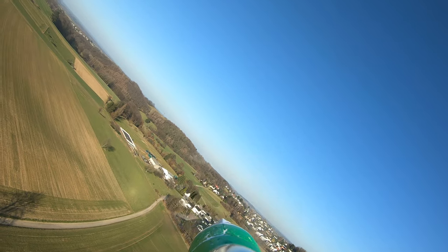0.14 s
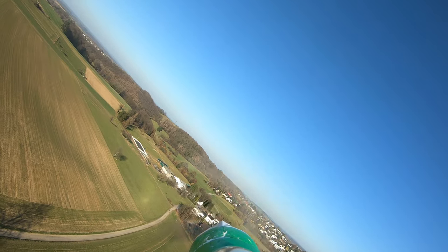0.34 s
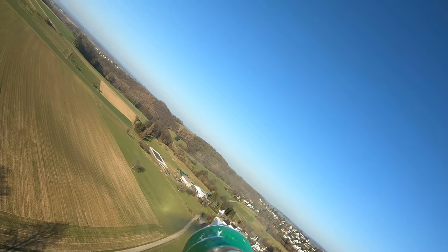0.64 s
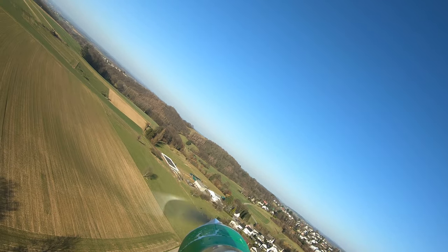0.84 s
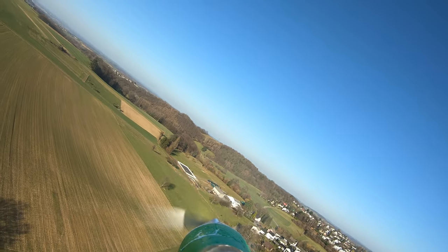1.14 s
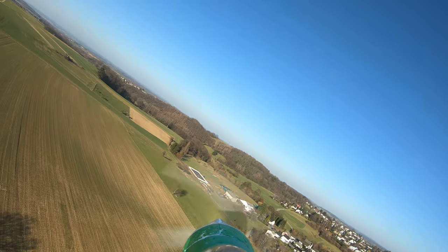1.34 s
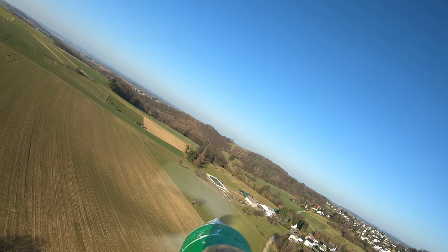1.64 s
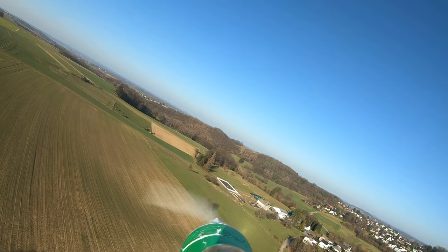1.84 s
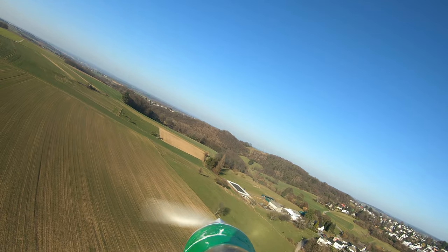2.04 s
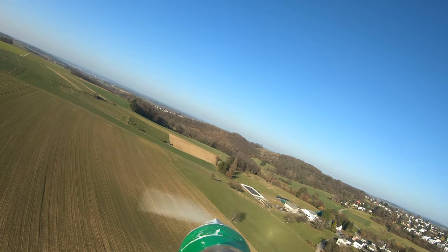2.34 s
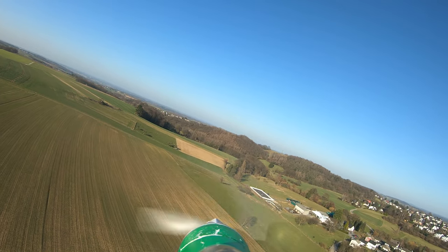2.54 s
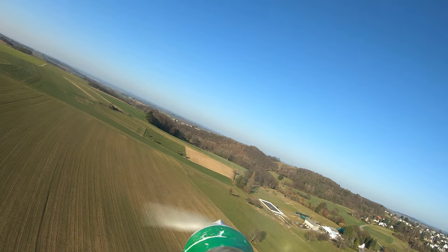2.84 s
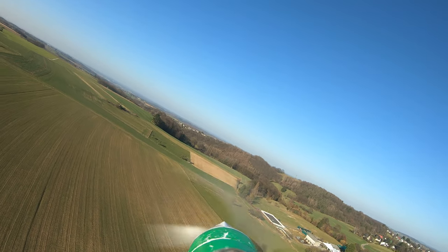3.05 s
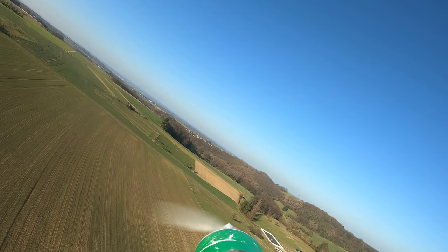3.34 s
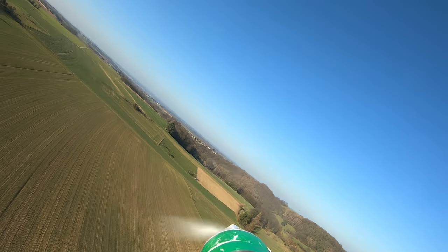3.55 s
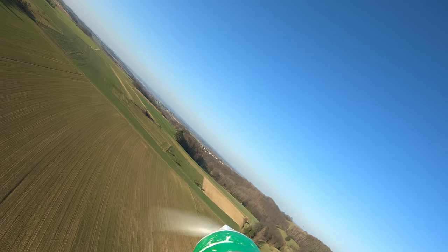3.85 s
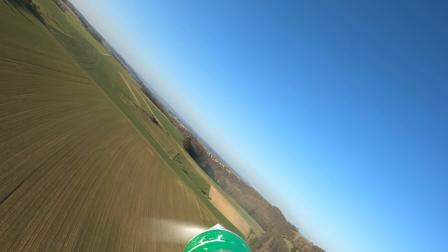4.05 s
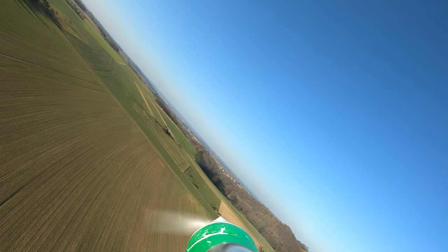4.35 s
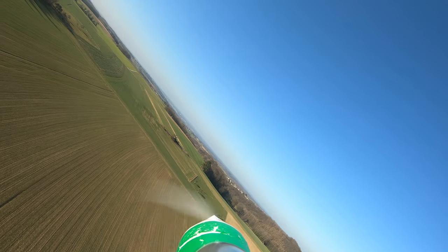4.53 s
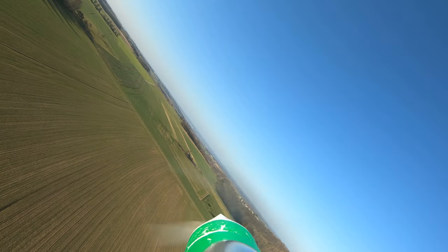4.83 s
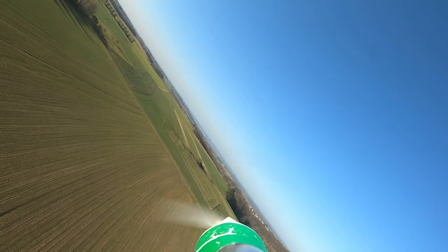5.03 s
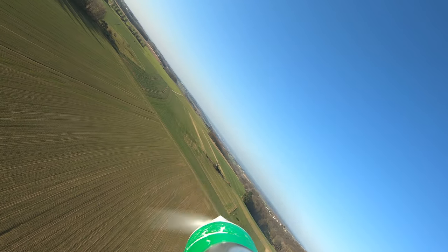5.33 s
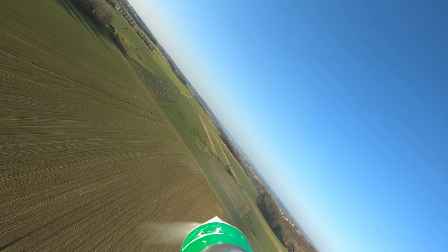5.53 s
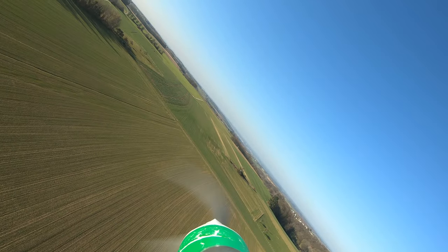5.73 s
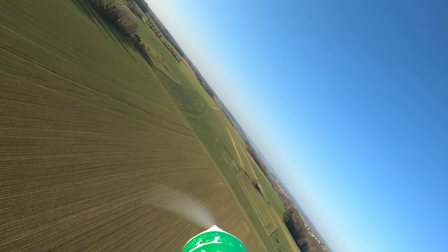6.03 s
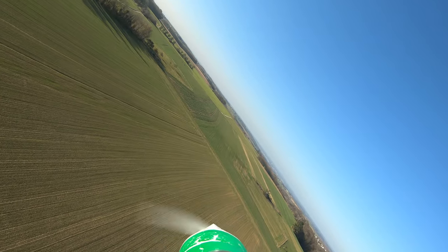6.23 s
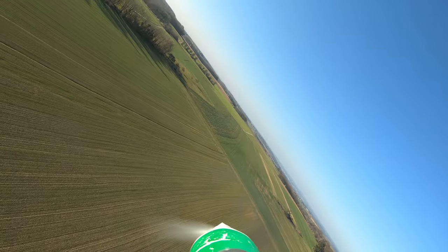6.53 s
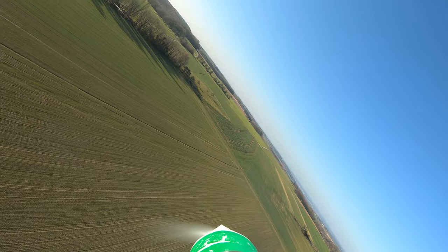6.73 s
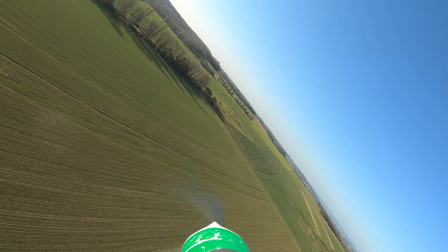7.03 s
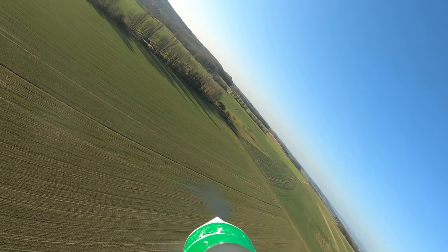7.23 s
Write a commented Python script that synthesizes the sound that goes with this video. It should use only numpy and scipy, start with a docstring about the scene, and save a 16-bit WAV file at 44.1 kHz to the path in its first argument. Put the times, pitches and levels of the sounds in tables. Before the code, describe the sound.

Close behind the propeller of a small electric model plane in flight, a low, buzzing drone holds almost steady while wind thumps and hisses over the microphone. Eddies briefly make the hum falter. Around five seconds the throttle eases, the pitch sags and the tone thins into rough wind and a high motor whine, before the hum firms up at a lower speed.

```python
"""On the fuselage of a small electric model airplane, a camera rides just behind the two-blade propeller.
The blades hum and swish, the slipstream buffets both microphone ports and hisses over the fuselage.
Now and then an eddy makes the drone stumble. After five seconds the throttle comes back: the pitch sags,
the blades freewheel in rough air and the motor and its controller whine, until the blades bite again
at the lower speed. Tones follow the blade phase; the air is coloured noise steered by turbulence and gusts."""
import sys
import numpy as np
from scipy import signal
from scipy.fft import rfft
from scipy.io import wavfile
from scipy.ndimage import uniform_filter1d

SR = 44100
rng = np.random.default_rng(int(sys.argv[2]) if len(sys.argv) > 2 else 0)


def master(y):
    """Save y as 16-bit WAV."""
    cut = np.clip(np.atleast_2d(y).T, -1, 1)
    pcm = np.round(cut * 32767)  # scale
    wavfile.write(sys.argv[1], SR, pcm.astype(np.int16))


N = 325458
TIME = np.arange(N) / SR


def undb(db):
    """Decibels to gain."""
    return 10 ** (np.asarray(db) / 20)


def curves(table):
    """Each column of a timed table, joined by straight lines."""
    time_s, *columns = np.transpose(table)
    return [np.interp(TIME, time_s, column) for column in columns]


def walk(rate_hz):
    """Random levels held 1 / rate_hz seconds and smoothed twice; spread near 1."""
    hold = max(int(SR / rate_hz), 2)
    held = rng.standard_normal(4096)[(np.arange(N) // hold) % 4096]
    return 1.55 * uniform_filter1d(uniform_filter1d(held, hold), hold)


def white():
    """White noise."""
    return rng.standard_normal(N)


def colour(x, spectrum):
    """Give x a spectrum; the result is analytic and its real part has rms 1."""
    hz, db = np.transpose(spectrum)
    bin_hz = np.maximum(np.arange(N // 2 + 1) * SR / N, 1)
    gain = undb(np.interp(np.log(bin_hz), np.log(hz), db, left=-120, right=-120))
    # leaving the negative frequencies empty makes the signal analytic
    analytic = np.fft.ifft(rfft(x) * gain, N)
    return analytic / analytic.real.std()


def tone(phase, db):
    """Analytic sine whose real part has the given rms level."""
    return np.sqrt(2) * undb(db) * np.exp(1j * phase)


def ports(analytic, pan_db, lead):
    """An analytic sound at both ports: left minus right in dB, left leading by an angle in radians."""
    left = (analytic * np.exp(1j * lead)).real * undb(pan_db / 2)
    right = analytic.real * undb(-pan_db / 2)
    return np.array([left, right])


# propeller speed; columns: time_s, blade_rate_hz
BLADE_RATE = [(0, 145), (.2, 143.6), (.45, 144.5), (.8, 145.2), (1.25, 147.1), (2.1, 146.6), (4.3, 146.8),
              (4.45, 146.3), (4.65, 143.7), (5.08, 143.1), (5.2, 139), (5.3, 134.7), (5.45, 127.2),
              (5.6, 123.2), (5.88, 120.7), (6.35, 121.9), (6.55, 121.2), (6.68, 120), (6.95, 120.1),
              (7.18, 122.3), (7.38, 122.1)]
# roughness of the air that meets the nose; columns: time_s, turbulence_db (above the usual)
TURBULENCE = [(0, 10), (.06, -7.5), (.15, 1.5), (.29, -1), (.43, 2), (.61, -0.5), (.95, -1), (1.1, .5),
              (1.44, 0), (1.58, -2), (1.75, 2), (1.91, -1), (2.18, 2), (2.36, -1.5), (2.47, 3.5),
              (2.58, 0.5), (2.66, -2), (2.8, -4.5), (3.1, -2.5), (3.35, .5), (3.5, -0.5), (3.62, 2),
              (3.76, 5.5), (3.84, 1), (3.98, 4.5), (4.05, 2.5), (4.12, 0), (4.2, 1), (4.325, 5), (4.36, -4),
              (4.6, -2.5), (4.76, 0.5), (4.85, -2), (5.02, 3), (5.5, 1.5), (6.0, 2.5), (6.9, 2), (7.06, 0),
              (7.13, -5)]
CRUISE_HZ, SLOW_HZ = 146, 122  # blade rates
# with the throttle back the blades stop pulling and freewheel for a while
FREEWHEEL_START_S, FREEWHEEL_ATTACK_S, FREEWHEEL_END_S, FREEWHEEL_RELEASE_S = 4.95, 0.19, 7.12, 0.23


def flight():
    """The state of the flight: turbulence in dB, how far the propeller has slowed and how freely it wheels (0-1)."""
    hz, = curves(BLADE_RATE)
    turbulence_db, = curves(TURBULENCE)
    slow = np.clip((CRUISE_HZ - hz) / (CRUISE_HZ - SLOW_HZ), 0, 1)
    onset = (TIME - FREEWHEEL_START_S) / FREEWHEEL_ATTACK_S
    release = (FREEWHEEL_END_S - TIME) / FREEWHEEL_RELEASE_S
    free = np.clip(np.minimum(onset, release), 0, 1)
    return turbulence_db, slow, free


def level(law, state):
    """A sound's base level in dB, following the state of the flight."""
    cruise_db, db_per_turbulence_db, slow_db, freewheel_db = law
    turbulence_db, slow, free = state
    return cruise_db + db_per_turbulence_db * turbulence_db + slow_db * slow + freewheel_db * free


# single eddies that strike the nose; columns: centre_s, length_s (width at 1/e), depth (0-1)
EDDIES = [(0.158, 0.086, 0.95), (0.343, 0.15, 0.34), (0.51, 0.083, 0.24), (1.071, 0.16, 1),
          (1.724, 0.095, 0.85), (1.949, 0.25, 0.2), (2.153, 0.17, 0.32), (2.426, 0.061, 0.98),
          (3.378, 0.13, 0.43), (3.617, 0.083, .9), (3.763, 0.12, 0.95), (3.93, 0.14, 1), (4.09, .06, 0.5),
          (4.278, 0.076, 1), (4.541, 0.046, 0), (4.785, 0.19, .3), (5.021, 0.18, .8), (5.28, 0.1, 0.2),
          (5.627, .08, 0.67), (5.93, 0.19, .9), (6.42, 0.07, .6), (6.73, .07, 0.3)]


def eddies():
    """How far passing eddies tear the flow off the ports (about 0-1): each swells and ebbs like a bell curve."""
    return sum(depth * np.exp(-(2 * (TIME - centre_s) / length_s) ** 2)
               for centre_s, length_s, depth in EDDIES)


# deep gusts around the camera, relative spectrum; columns: pitch_hz, density_db (per Hz)
RUMBLE = [(15, -13), (35, 0), (65, 3), (110, -11.5), (190, -0.5), (300, -22.5)]
# their base level; columns: cruise_db, db_per_turbulence_db, slow_db, freewheel_db (the last two added)
RUMBLE_LEVEL = (-31.7, -0.85, 2.5, 8.5)


def rumble(state, shared=0.26, gust_db=1.8):
    """Large slow eddies wrap the whole camera: low noise, partly common to both ports."""
    common = white()
    sides = []
    for _ in range(2):
        mixed = np.sqrt(shared) * common + np.sqrt(1 - shared) * white()
        sides.append(colour(mixed, RUMBLE).real)
    return np.array(sides) * undb(level(RUMBLE_LEVEL, state) + gust_db * walk(11))


# wind on each microphone port, relative spectra; columns: pitch_hz, density_db (per Hz)
BUFFET_LEFT = [(15, -19), (40, -10), (80, -3), (140, -0.5), (230, 0), (320, -1), (450, -8.5), (700, -22),
               (1500, -56)]
BUFFET_RIGHT = [(15, -15.5), (40, -4), (80, -1.5), (140, 0.5), (230, -8), (320, -6.5), (450, -18),
                (700, -21.5), (1500, -45)]
# base levels at the ports; columns: cruise_db, db_per_turbulence_db, slow_db, freewheel_db
BUFFET_LEFT_LEVEL = (-14.5, 0.02, 1, -4)
BUFFET_RIGHT_LEVEL = (-24, 0.72, 5, 0.5)
# rise and fall of the buffeting, added at both ports; columns: time_s, level_db
BUFFETING = [(0, -3.5), (.3, 1.5), (1.05, 1.1), (1.4, 0), (2.5, -1), (2.9, -3.5), (3.4, 0.5), (4.3, 1),
             (4.6, -2.5), (4.95, 0.5), (5.2, 2.5), (5.47, -0.5), (5.62, -1.5), (5.75, 2.5), (5.95, -5.5),
             (6.12, -1), (6.32, 3), (6.5, -1), (6.72, 1.5), (7.02, -1.5), (7.15, -2.5), (7.38, 0)]


def buffet(state, gust, shared=0.28, lump_db=1.25, gust_db=0.67):
    """Eddies thump on each port as low noise; only the largest, lowest ones reach both alike."""
    common = white()
    buffeting_db, = curves(BUFFETING)
    big_eddies = signal.sosfilt(signal.butter(2, 130, fs=SR, output="sos"), common)
    weight = np.sqrt(shared) * 1.78
    sides = []
    for spectrum, law in ((BUFFET_LEFT, BUFFET_LEFT_LEVEL), (BUFFET_RIGHT, BUFFET_RIGHT_LEVEL)):
        thumps = colour(white() + weight * big_eddies, spectrum).real
        db = level(law, state) + buffeting_db + lump_db * walk(24) + gust_db * gust
        sides.append(thumps * undb(db))
    return np.array(sides)


# air along the fuselage, relative spectrum; columns: pitch_hz, density_db (per Hz)
HISS = [(300, 2.5), (1000, -3), (2000, -9), (2600, -9.5), (3600, -9.5), (4400, -17), (5600, -16.5),
        (7000, -21), (8300, -24.5), (9400, -23), (10300, -28), (11500, -36.5), (14000, -48)]
# its base level; columns: cruise_db, db_per_turbulence_db, slow_db, freewheel_db
HISS_LEVEL = (-43, 1, 1, 0)


def fuselage(blade, state, gust, chop=0.17, apart=0.1, surge_db=0.9, gust_db=0.24):
    """Air hisses over the fuselage as grainy noise, surging while the blades pull."""
    _, _, free = state
    # each grain of 16 samples has its own level
    grain_db = 1.4 * np.repeat(rng.standard_normal(N // 16 + 1), 16)[:N]
    grains = white() * undb(grain_db)
    surge = surge_db * (1 - free) * walk(4.9)
    db = level(HISS_LEVEL, state) + surge + gust_db * gust + 0.57 * walk(50)
    flow = undb(db) * (1 + chop * np.cos(2 * blade))
    left, right = (colour(grains + apart * white(), HISS).real * flow for _ in range(2))
    # the finest hiss favours the right port
    dull = signal.sosfiltfilt(signal.butter(1, 4500, fs=SR, output="sos"), left)
    return np.array([0.63 * left + .5 * dull, 1.355 * right])


# rush of air, swish of the blades, and flow that tears off the unloaded blades;
# relative spectra; columns: pitch_hz, density_db (per Hz)
RUSH = [(150, -30.5), (350, 1), (550, 3.5), (750, -2), (1000, -9.5), (1500, -18), (2100, -40.5),
        (3000, -35.5), (5000, -38), (8000, -56)]
SWISH = [(500, 1.5), (900, -2.5), (1400, -2), (2000, -7), (2800, -17.5), (4500, -41)]
STALL = [(550, -12.5), (800, 1), (960, -1), (1200, -9.5), (1800, -10), (2800, -21.5)]
# their base levels; columns: cruise_db, db_per_turbulence_db, slow_db, freewheel_db
RUSH_LEVEL = (-26, 0.6, 2, -3.5)
SWISH_LEVEL = (-37, -0.17, -8.5, -3)
STALL_LEVEL = (-56, 0.5, 11.5, 7)


def slipstream(blade, state, gust, chop=0.52, rush_gust_db=-0.3, swish_gust_db=1.38):
    """Air rushes past, swishes with each blade and tears off louder when the blades freewheel."""
    rush_db, swish_db, stall_db = (level(law, state) for law in (RUSH_LEVEL, SWISH_LEVEL, STALL_LEVEL))
    rush = colour(white(), RUSH) * undb(rush_db + rush_gust_db * gust) * (1 + .15 * np.cos(blade))
    swish = ports(colour(white(), SWISH) * undb(swish_db), pan_db=-1.5, lead=-1.9)
    stall = ports(colour(white(), STALL) * undb(stall_db), pan_db=-6.0, lead=2.67)
    blade_passes = 1 + chop * np.cos(blade) + 0.082 * np.cos(2 * blade)
    chopping = blade_passes * undb(swish_gust_db * gust + .5 * walk(11))
    # the rush is heard in opposite phase at the two sides, wide in stereo
    return ports(rush, pan_db=0.5, lead=np.pi) + (swish + stall) * chopping


# ringing of the motor mount; columns: pitch_hz, width_hz, gain_db
MOUNT = [(2950, 150, 8.5), (4000, 340, -8), (5200, 350, -7)]


def mount(x):
    """The resonances of the motor mount, as parallel peak filters."""
    return sum(undb(gain_db) * signal.lfilter(*signal.iirpeak(hz, hz / width_hz, fs=SR), x)
               for hz, width_hz, gain_db in MOUNT)


# whines of the magnets and ball bearings; columns: order (per shaft turn), level_db (relative)
MAGNETS = [(30, -11), (50.6, -22.5), (57.3, -18), (58, -13), (59, -16), (60, -1.9), (66, -19), (68, -18),
           (78, -18), (79.5, -23.5), (85.5, -26), (87.7, -25), (89.5, -19.5), (120, -24.5)]
BEARINGS = [(33.3, -6.5), (41.55, -4), (49.85, -4.5)]
# rasp of the motor, relative spectrum; columns: pitch_hz, density_db (per Hz)
RASP = [(1500, -20), (2500, -3.5), (3300, 5), (4200, 0), (5400, -3), (6200, -13.5), (9000, -17.5),
        (11000, -36)]
# base levels; columns: cruise_db, db_per_turbulence_db, slow_db, freewheel_db
MAGNET_LEVEL = (-72.5, -0.1, 14.5, 4)
BEARING_LEVEL = (-70.5, 1.1, 0.5, 7)
SWITCHING_LEVEL = (-71, 1.1, 14, -2)
RASP_LEVEL = (-62, 0, 9, 4.5)
SWITCHING_HZ = 7957
# the whine swells as the freewheeling motor settles on a resonant speed
RESONANT_BLADE_HZ, RESONANCE_WIDTH_HZ, RESONANCE_DB = 120.2, 1.8, 12


def motor(blade, hz, state, ring=0.93):
    """Magnets and bearings whine at shaft orders and ring the mount; the controller adds its switching tone."""
    _, _, free = state
    detuning = (hz - RESONANT_BLADE_HZ) / RESONANCE_WIDTH_HZ
    swell_db = RESONANCE_DB * free / (1 + detuning ** 2)
    magnet_db = level(MAGNET_LEVEL, state) + swell_db
    bearing_db = level(BEARING_LEVEL, state) + 0.24 * swell_db
    shaft = blade / 2  # two blades pass per turn
    whine = 0
    for orders, base_db in ((MAGNETS, magnet_db), (BEARINGS, bearing_db)):
        for order, order_db in orders:
            blur = 0.06 + 0.063 * abs(order_db)  # radians; the weak orders waver most
            phase = order * shaft + blur * walk(45)
            whine = whine + tone(phase, base_db + order_db + .9 * walk(19) + 1.5)
    # the chopped current rasps, pulsing once per shaft turn and louder at part throttle
    rasp = colour(white(), RASP) * undb(level(RASP_LEVEL, state)) * (1 + 0.24 * np.cos(shaft))
    switching_phase = 2 * np.pi * SWITCHING_HZ * TIME + .25 * walk(60)
    switching = tone(switching_phase, level(SWITCHING_LEVEL, state) - 9.0 + walk(12))
    body = ports(whine + ring * mount(whine) + rasp, pan_db=-3.0, lead=-0.82)
    return body + ports(switching, pan_db=-18.0, lead=.5)


# the two strongest blade harmonics at each port, base levels;
# columns: cruise_db, db_per_turbulence_db, slow_db, freewheel_db
FUNDAMENTAL_LEFT = (-13.5, -0.33, -7, -4)
FUNDAMENTAL_RIGHT = (-18.5, 1.62, -2.5, -0.5)
OCTAVE_LEFT = (-11.5, 0.27, 3.5, -7)
OCTAVE_RIGHT = (-17, 0.6, 4, -2.5)
# shift of all the weaker overtones; columns: cruise_db, db_per_turbulence_db, slow_db, freewheel_db
OVERTONE_LEVEL = (-1.3, 0.34, -1.3, -0.017)
# weaker blade overtones before that shift; columns: multiple (of the blade rate), left_db, right_db
OVERTONES = [(4, -37, -37.5), (5, -35.5, -37.5), (6, -44.5, -43.5), (7, -48.5, -45), (8, -44.5, -45.5),
             (9, -49.5, -50), (10, -47, -47), (12, -61, -55), (13, -61.5, -58.5), (15, -62.5, -60.5)]
# third blade harmonic; columns: time_s, level_db
THIRD = [(0, -26), (.4, -30.5), (.9, -27.5), (1.3, -28.5), (2.25, -26), (2.6, -32.5), (3.8, -35.5),
         (4.5, -31.5), (4.9, -32.5), (5.3, -33), (6.7, -43), (7.1, -35)]
# how hard the blades bite the air, which brings out their harmonics; columns: time_s, bite_db
BITE = [(0, 2), (.9, 0.5), (2.6, -0.9), (3.3, -1.2), (4.5, -0.9), (4.95, -1.2), (5.15, -7), (5.55, -8),
        (5.8, -10), (6.1, -7.5), (6.25, -4), (6.5, -7.5), (6.85, -5), (7.02, -4.5), (7.14, 4.5),
        (7.38, 2.5)]
# angle by which the left port leads the right: (radians at cruise, radians at slow speed)
FUNDAMENTAL_LEAD, OCTAVE_LEAD = (-1.91, -1.9), (2.064, 4.03)
# what a full eddy does: level changes in dB, and the lag of the hum at the left port in radians
EDDY_FUNDAMENTAL_LEFT_DB, EDDY_OCTAVE_LEFT_DB, EDDY_OCTAVE_RIGHT_DB, EDDY_LAG = -4.5, -13, -8, 2.1


def propeller(blade, state, eddy, sway_left=0.33, sway_right=0.06, shiver_left=0.19, shiver_right=0.14,
              fade_left_db=0.4, fade_right_db=1.3, sway=0.15, shiver=0.17, flutter_db=2.5,
              unsettle=0.77, overtone_bite=0.4, lead=-2.54, unload_lead=2.4):
    """Blade pressure waves: eddies duck and delay them, most at the left port, and rough air makes them waver."""
    turbulence_db, slow, free = state
    bite_db, = curves(BITE)
    third_db, = curves(THIRD)
    rough = undb(unsettle * turbulence_db)
    first_lead, second_lead = (cruise + (slowed - cruise) * slow
                               for cruise, slowed in (FUNDAMENTAL_LEAD, OCTAVE_LEAD))
    first_lead = first_lead + unload_lead * free * (1 - slow)

    first_left_db, second_left_db = (level(law, state) + fade_left_db * rough * walk(13)
                                     for law in (FUNDAMENTAL_LEFT, OCTAVE_LEFT))
    first_right_db, second_right_db = (level(law, state) + fade_right_db * rough * walk(12)
                                       for law in (FUNDAMENTAL_RIGHT, OCTAVE_RIGHT))
    first_left_db = first_left_db + EDDY_FUNDAMENTAL_LEFT_DB * eddy
    second_left_db = second_left_db + bite_db + EDDY_OCTAVE_LEFT_DB * eddy
    second_right_db = second_right_db + bite_db + EDDY_OCTAVE_RIGHT_DB * eddy

    # phases: a waver common to both ports, then one of each port's own
    shared = blade + rough * (sway * walk(9) + shiver * walk(32))
    lag = EDDY_LAG * eddy * (1 - free)
    left = shared + rough * (sway_left * walk(9) + shiver_left * walk(45)) - lag
    right = shared + rough * (sway_right * walk(5.7) + shiver_right * walk(45))

    first = [tone(left + first_lead, first_left_db), tone(right, first_right_db)]
    second = [tone(shared + left + second_lead, second_left_db),
              tone(shared + right - lag / 2, second_right_db)]
    third = tone(2 * shared + left + 0.43 * walk(13), third_db + 1.5 * walk(16))
    hum = np.real(first) + np.real(second) + ports(third, pan_db=-0.5, lead=-1.5 + 0.4 * walk(18))

    overtone_db = level(OVERTONE_LEVEL, state) + overtone_bite * bite_db
    for multiple, left_db, right_db in OVERTONES:
        phase = round(multiple) * blade + 0.17 * walk(20) + rng.uniform(0, 2 * np.pi)
        db = (left_db + right_db) / 2 + overtone_db + flutter_db * walk(10)
        hum = hum + ports(tone(phase, db), left_db - right_db, lead)
    return hum


EDDY_SLIPSTREAM_DB = -4  # a full eddy also dips the slipstream


def scene():
    """Propeller speed drives hum, whine and chopping of the air; turbulence and quick gusts drive the wind."""
    hz, = curves(BLADE_RATE)
    state, gust, eddy = flight(), walk(36), eddies()
    # blade-passing phase, with a slight unsteadiness of speed
    blade = 2 * np.pi * np.cumsum(hz * (1 + 0.00044 * walk(25))) / SR
    wind = rumble(state) + buffet(state, gust) + fuselage(blade, state, gust)
    wind = wind + slipstream(blade, state, gust) * undb(EDDY_SLIPSTREAM_DB * eddy)
    return wind + motor(blade, hz, state) + propeller(blade, state, eddy)


TOP_HZ, FADE_S = 14500, .004


def record(dry, threshold_db=-11, squeeze=0.62, makeup_db=0.47):
    """The camera compresses the wind-laden bass of each port, rounds the highest peaks and cuts the top."""
    bass = signal.sosfiltfilt(signal.butter(2, 600, fs=SR, output="sos"), dry)
    window = 600  # samples
    power = uniform_filter1d(uniform_filter1d(bass ** 2, window), window)
    excess = power / undb(threshold_db) ** 2
    gain = undb(makeup_db) * (1 + excess ** 2) ** (-squeeze / 4)
    out = dry + (gain - 1) * bass
    out = out / (1 + (np.abs(out) / .9) ** 12) ** (1 / 12)
    # short fades at both ends
    out = out * np.minimum(np.minimum(TIME, TIME[-1] - TIME) / FADE_S, 1)
    return signal.sosfilt(signal.ellip(8, .2, 70, TOP_HZ, fs=SR, output="sos"), out)


dry = scene()
out = record(dry)
master(out)
```